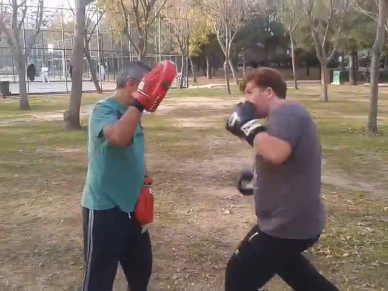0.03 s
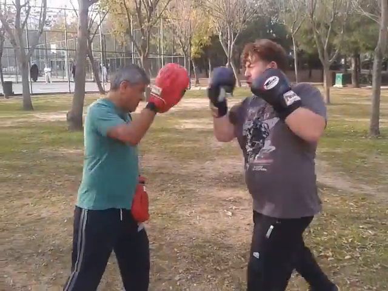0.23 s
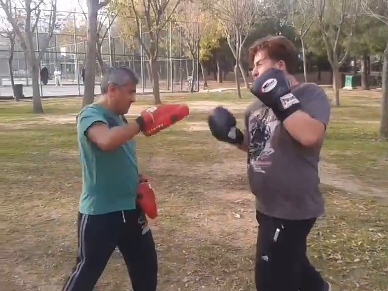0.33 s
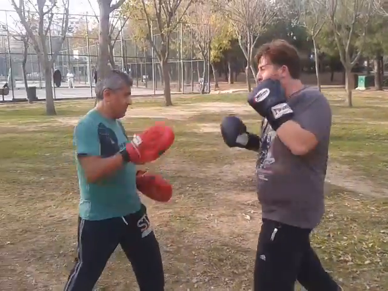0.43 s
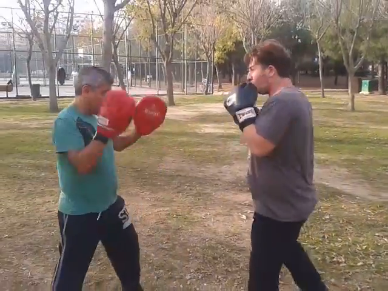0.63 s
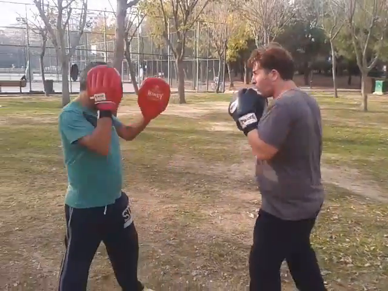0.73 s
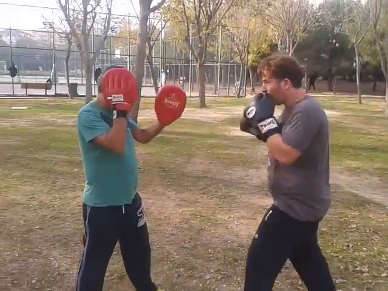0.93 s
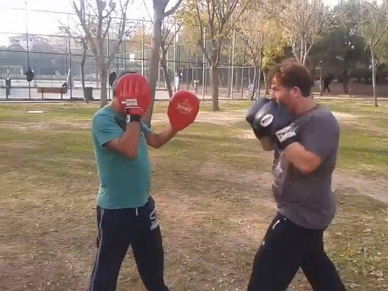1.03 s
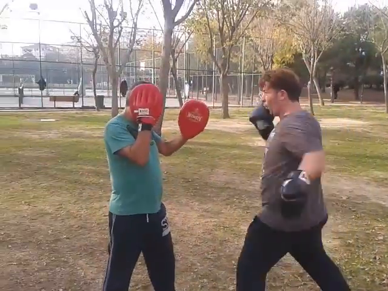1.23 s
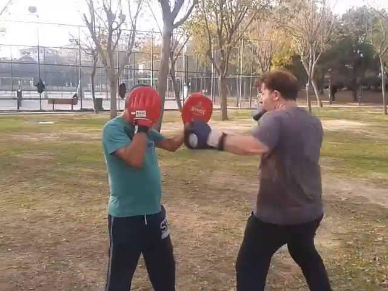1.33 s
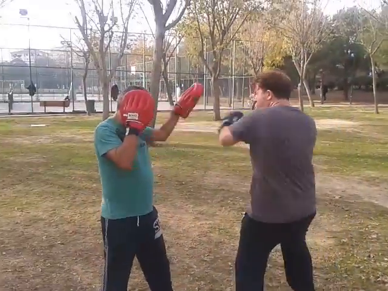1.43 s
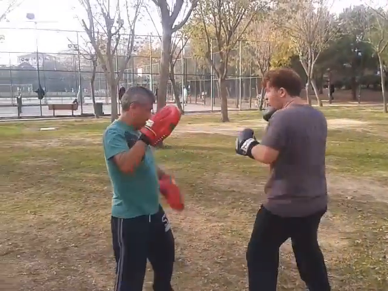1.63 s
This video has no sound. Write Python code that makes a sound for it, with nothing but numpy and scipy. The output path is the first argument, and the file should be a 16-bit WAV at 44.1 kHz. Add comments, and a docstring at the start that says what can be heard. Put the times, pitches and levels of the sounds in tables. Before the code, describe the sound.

Two punches strike padded mitts a few metres from the microphone, each a short thump with a leather crack, the first a little louder. A low, steady murmur of distant traffic surrounds the open park.

```python
"""Distant traffic murmurs around an open park; over it, two punches land on padded mitts a few metres away.
Each is a thump of squeezed padding, a short ring of the mitt's skin and a leather crack.
The ground doubles the thump, trees and lawn scatter a soft tail, rows of fence bars return
a falling tone, and trunks throw back a few dull echoes."""
import sys
import numpy as np
from scipy import signal
from scipy.fft import rfft, irfft
from scipy.io import wavfile

SR = 44100
rng = np.random.default_rng(int(sys.argv[2]) if len(sys.argv) > 2 else 0)


def log_audio(samples):
    """Write samples as a 16-bit WAV file to the path given in sys.argv[1]."""
    # one column per channel
    frames = np.atleast_2d(samples).T
    # limit to full scale, then quantise
    limited = np.clip(frames, -1, 1)
    pcm = np.round(limited * 32767).astype(np.int16)
    wavfile.write(sys.argv[1], SR, pcm)


N = 74970
TIME = np.arange(N) / SR


def from_db(db):
    """Decibels to gain."""
    return 10 ** (np.asarray(db) / 20)


def butter(x, hz, kind, order=2):
    """Causal Butterworth filter."""
    return signal.sosfilt(signal.butter(order, hz, kind, fs=SR, output="sos"), x)


def delayed(x, delay_s):
    """The same sound, arriving later."""
    return np.concatenate([np.zeros(round(delay_s * SR)), x])[:N]


def noise(spectrum):
    """Noise of rms 1, coloured by (f/Hz, level/dB) points."""
    hz, db = np.transpose(spectrum)
    bins = np.maximum(np.fft.rfftfreq(N, 1 / SR), 1)
    colour = from_db(np.interp(np.log(bins), np.log(hz), db))
    x = irfft(rfft(rng.standard_normal(N)) * colour, N)
    return x / x.std()


def decay(t60_s, hold_s=0):
    """Hold at full level, then fall 60 dB every t60_s."""
    return np.exp(-np.log(1000) * np.maximum(TIME - hold_s, 0) / t60_s)


def envelope(attack_s, hold_s, t60_s):
    """Attack, hold, exponential release."""
    return (1 - np.exp(-TIME / attack_s)) * decay(t60_s, hold_s)


# Colour of the traffic bed, rumble up to faint hiss: f/Hz, relative level/dB
TRAFFIC_SPECTRUM = [(25, -11), (50, -3), (85, 0), (160, 1), (300, 0), (550, -9), (900, -10), (1600, -18),
                    (2400, -26.5), (3500, -31.5), (7000, -33), (15500, -34)]
# Its slow level ride: t/s, level/dB
TRAFFIC_RIDE = [(0, -52.5), (.62, -51.5), (1.14, -53.5), (1.7, -52.5)]

def traffic(waver_db=0.5, waver_step_s=0.071):
    """A steady, slightly wavering murmur from beyond the park."""
    knots = np.arange(0, N / SR + 1, waver_step_s)
    waver = np.interp(TIME, knots, rng.standard_normal(len(knots)))
    ride_db = np.interp(TIME, *np.transpose(TRAFFIC_RIDE))
    return noise(TRAFFIC_SPECTRUM) * from_db(ride_db + waver_db * waver)


def padding(hz, squeeze_s, release_t60_s, attack_s=0.00032, wobble_hz=326.5):
    """The body of the hit: air driven out of the padding gives a strong swing and a dying wobble."""
    swing = np.cos(2 * np.pi * hz * TIME) * envelope(attack_s, squeeze_s, release_t60_s)
    wobble = np.sin(2 * np.pi * wobble_hz * TIME) * envelope(attack_s, hold_s=0, t60_s=0.0506)
    return swing + from_db(2.5) * wobble


# Modes of the mitts' skin, before the low-pass: f/Hz, t60/s, first mitt level/dB, second mitt level/dB
SKIN_MODES = [(438, 0.072, -18, -17), (697, 0.028, -9, -2.5), (835, 0.059, -39, -13),
              (938, 0.021, -5.5, -41), (1410, 0.055, -29, -26.5), (1680, 0.0083, -46, -4),
              (1892, 0.02, -11, -24), (2310, 0.027, -17.5, -18), (2405, .018, -18, -39),
              (2665, 0.017, -15, -48), (3130, 0.013, -11, -32)]

def skin(mitt):
    """A short ring from the heavily damped modes of one mitt's cover."""
    rings = sum(from_db(levels_db[mitt]) * np.sin(2 * np.pi * hz * TIME) * decay(t60_s)
                for hz, t60_s, *levels_db in SKIN_MODES)
    return butter(rings, 2720, "low", order=4)


# Colour of the leather crack: f/Hz, relative level/dB
CRACK_SPECTRUM = [(300, 0), (1500, 2.5), (3000, -12.5), (3700, -17), (7000, -22), (10500, -20.5),
                  (13300, -16.5), (16000, -23)]

def crack(trim_db):
    """The bright edge of the hit: leather slaps on leather, then creases as it gives."""
    slap = envelope(attack_s=0.0001, hold_s=0.0018, t60_s=0.011)
    crease = from_db(-4) * envelope(attack_s=0.0001, hold_s=0, t60_s=0.053)
    return from_db(-18 + trim_db) * noise(CRACK_SPECTRUM) * np.hypot(slap, crease)


# Colour of the park's tail: f/Hz, relative level/dB
SCATTER_SPECTRUM = [(60, -26), (150, -5.5), (290, 3), (480, -5.5), (680, -2.5), (950, -9), (1300, -19.5),
                    (2200, -21.5), (3500, -40.5), (8000, -42.5), (14000, -40)]

def scatter(trim_db):
    """A dark, diffuse tail scattered back by trees and lawn."""
    tail = envelope(attack_s=0.0013, hold_s=0.034, t60_s=0.54)
    return from_db(-40 + trim_db) * noise(SCATTER_SPECTRUM) * tail


# Rows of fence bars: distance/m, bar spacing/m, strongest point along the row/m, fade length/m,
# first punch send/dB, second punch send/dB
FENCE_ROWS = [(2.7, .194, 5.4, 5.14, -26, -17.5), (12.0, .279, 16, 2.8, -15.5, -43),
              (2.7, .262, 11.3, 2.8, -17, -51), (4.0, .246, 24.6, 5.7, -27.5, -59.5)]

def fences(punch_db, mitt, bars=220, askew_m=0.017, uneven_db=2.5, knock_hz=833, sound_m_per_s=343):
    """Every bar returns a tiny knock; they arrive ever wider apart, so the tone sinks and settles."""
    echoes = np.zeros(N)
    for distance, spacing, strongest, fade, *sends_db in FENCE_ROWS:
        along = spacing * np.arange(bars)
        range_m = np.hypot(distance, along) + askew_m * rng.standard_normal(bars)
        round_trip_s = 2 * range_m / sound_m_per_s
        bar_db = punch_db + sends_db[mitt] + uneven_db * rng.standard_normal(bars)
        taper = np.exp(-abs(along - strongest) / fade)
        np.add.at(echoes, (round_trip_s * SR).astype(int), from_db(bar_db) * taper)
    knock = np.cos(2 * np.pi * knock_hz * TIME) * decay(t60_s=0.0052)
    return butter(signal.fftconvolve(knock, echoes)[:N], 1040, "low", order=4)


# Echo taps off tree trunks: delay/s, first punch send/dB, second punch send/dB
TRUNK_TAPS = [(0.042, -46, -39), (0.0474, -28.5, -50), (.121, -36, -32.5)]

def trunks(smack, mitt):
    """Each trunk throws back one dull copy of the smack."""
    echoes = sum(from_db(sends_db[mitt]) * delayed(smack, delay_s) for delay_s, *sends_db in TRUNK_TAPS)
    return butter(echoes, 600, "low")


# Hit list, one punch on each mitt: t/s, gain/dB, thump f/Hz, squeeze/s, release t60/s,
# crack trim/dB, ground delay/s, ground send/dB, scatter trim/dB
PUNCH_CUES = [(0.2489, -11.5, 247, 0.0035, 0.02, 3, .0038, -0.5, 3),
              (1.4402, -15.5, 232.6, 0.00346, 0.011, 0.5, 0.00393, -6.5, -4)]

def punches():
    """Each fist smacks a mitt; the thump bounces off the ground and the park answers."""
    out = np.zeros(N)
    for mitt, cue in enumerate(PUNCH_CUES):
        start_s, gain_db, hz, squeeze_s, t60_s, crack_db, ground_s, ground_db, scatter_db = cue
        thump = padding(hz, squeeze_s, t60_s)
        lows = butter(thump, 500, "low", order=1)  # the lawn reflects only the lows
        bounce = from_db(ground_db) * delayed(lows, ground_s)
        smack = from_db(gain_db) * (thump + bounce + skin(mitt) + crack(crack_db))
        park = fences(gain_db, mitt) + trunks(smack, mitt) + scatter(scatter_db)
        out += delayed(smack + park, start_s)
    return out


def scene():
    """Two punches over the traffic bed, in mono."""
    return (punches() + traffic())[None]


def record(dry, low_cut_hz=58, high_cut_hz=16000):
    """The small microphone loses the deep bass; the top is cut steeply."""
    thin = butter(dry, low_cut_hz, "high")
    steep_cut = signal.ellip(10, rp=0.1, rs=70, Wn=high_cut_hz, fs=SR, output="sos")
    return signal.sosfilt(steep_cut, thin)


dry = scene()
out = record(dry)
log_audio(out)
```